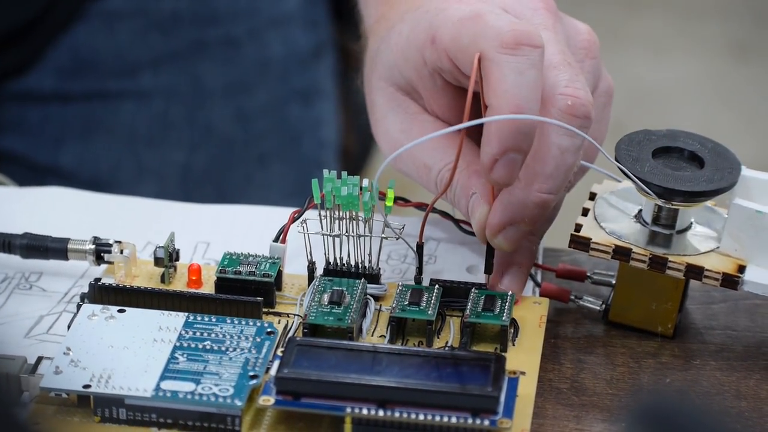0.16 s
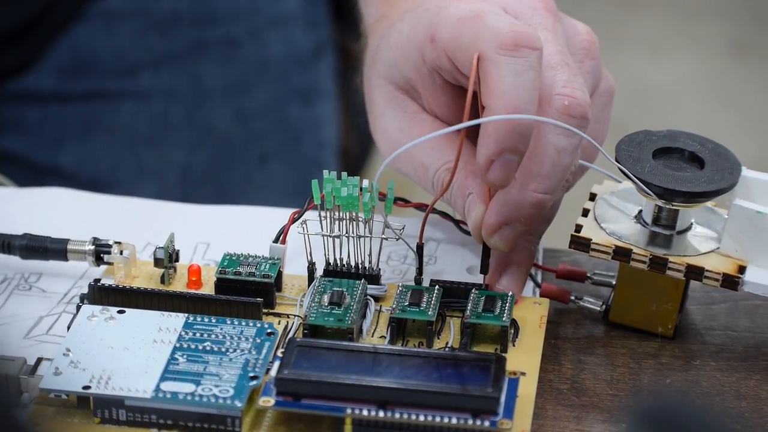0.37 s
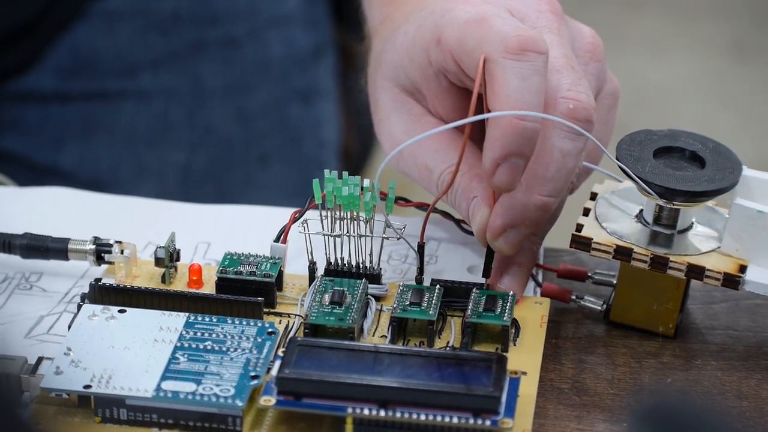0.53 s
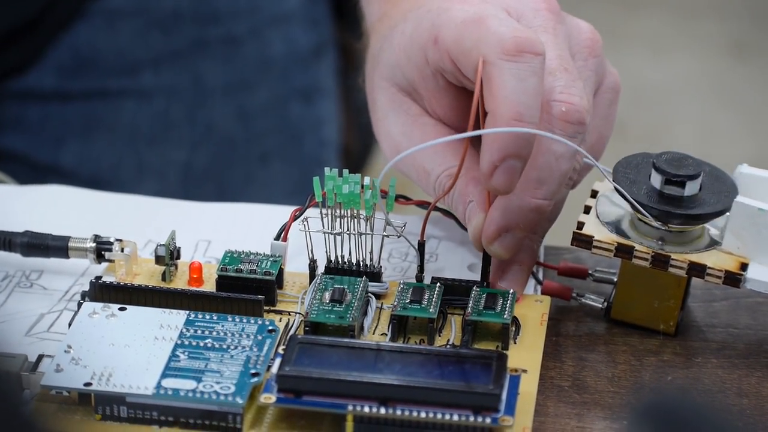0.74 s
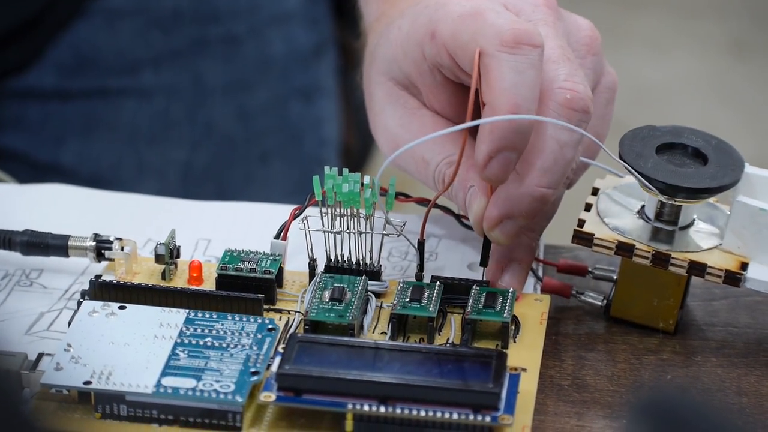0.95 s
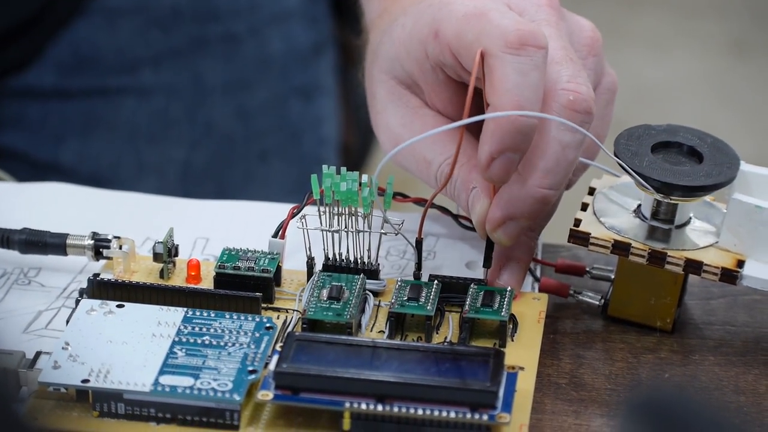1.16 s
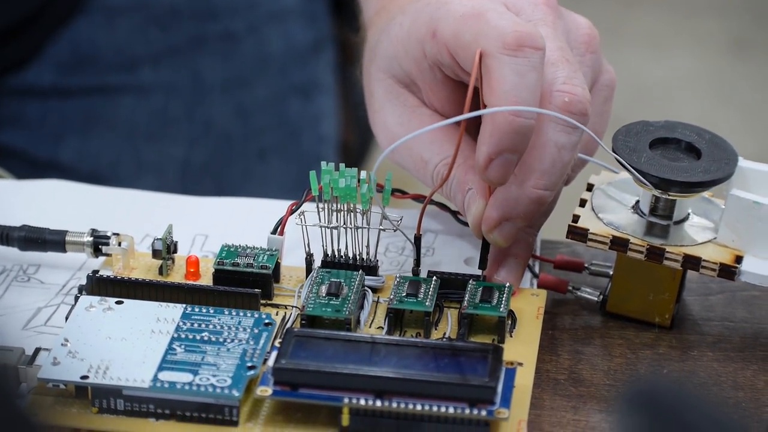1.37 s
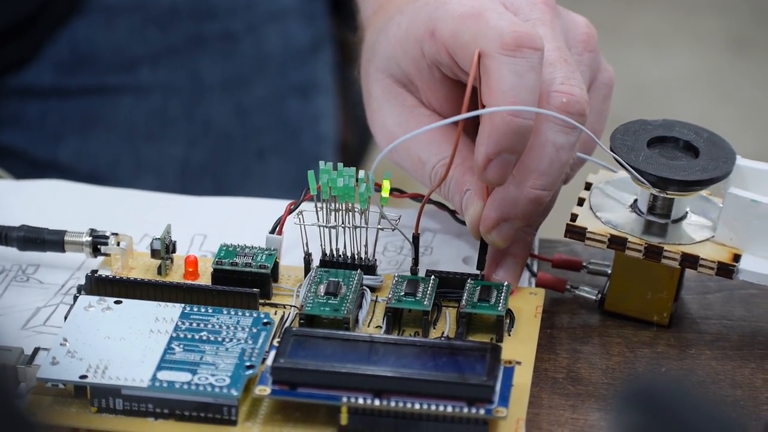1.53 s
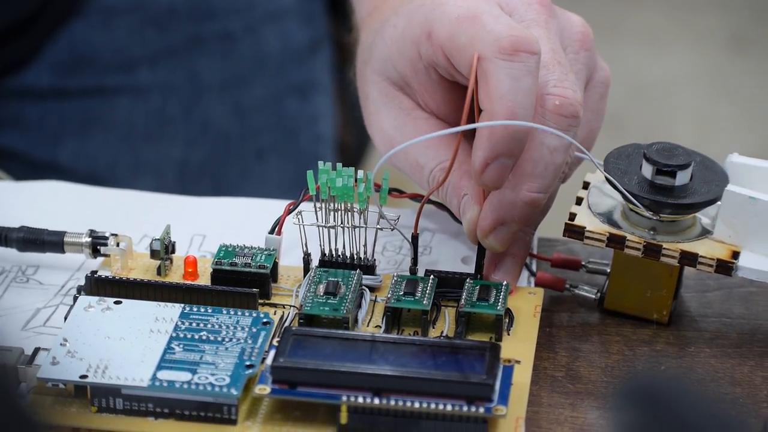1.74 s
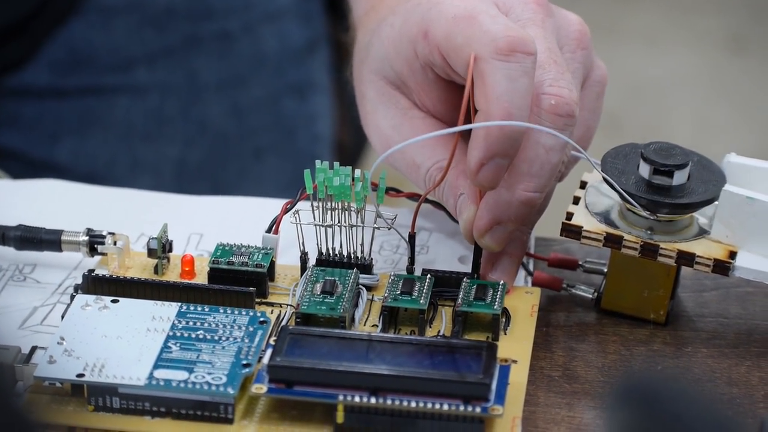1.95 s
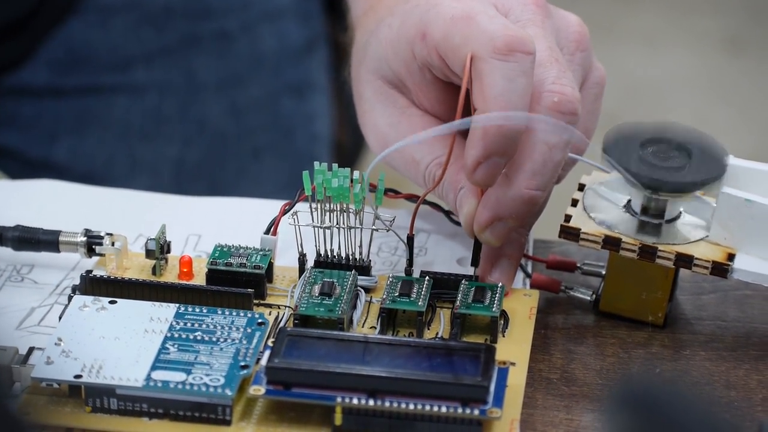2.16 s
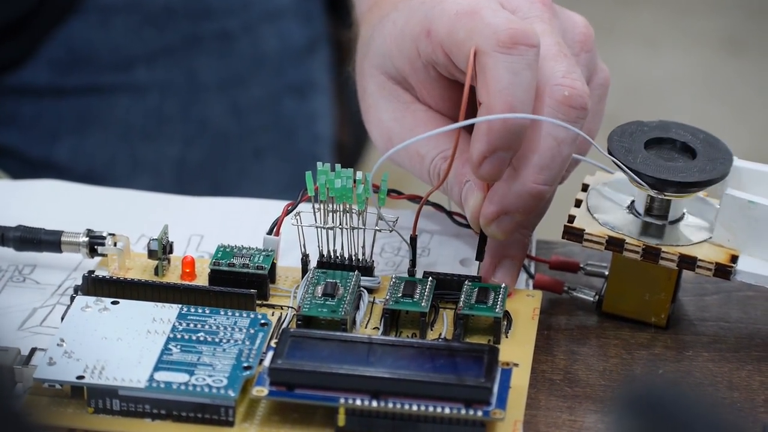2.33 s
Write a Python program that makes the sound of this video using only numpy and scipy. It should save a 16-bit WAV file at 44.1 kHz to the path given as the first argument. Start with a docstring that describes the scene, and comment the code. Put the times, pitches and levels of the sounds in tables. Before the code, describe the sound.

A solenoid clacks on and off twice over faint, steady room air. At about 0.8 seconds a wire ticks lightly and the steel plunger slams in, thumping its wooden stand with a short, low room boom. At 1.0 it springs back with a quick metallic rattle. Another tick and slam come at 1.8 seconds, and the plunger rattles back again at about 2.3.

```python
"""Over the steady air of a small room, a bare wire ticks as it switches on a solenoid on a plywood stand.
The plunger scrapes down its bore and slams home: the steel rings, the stand thumps, the workbench
reflects the blow and the room answers with a low boom. When the current stops, a spring throws the
plunger back and it rattles against its stop. The wire rubs faintly, and the solenoid is switched
on and off once more, this time held a little longer."""
import sys
import numpy as np
from scipy import signal
from scipy.fft import rfft, irfft
from scipy.io import wavfile

SR = 44100
rng = np.random.default_rng(int(sys.argv[2]) if len(sys.argv) > 2 else 0)


def transcribe(signal):
    """Save signal, clipped to [-1, 1], as a 16-bit WAV file at the path in sys.argv[1]."""
    frames = np.atleast_2d(signal).T
    limited = np.clip(frames, -1, 1)
    pcm = np.round(limited * 32767).astype(np.int16)
    wavfile.write(sys.argv[1], SR, pcm)


N = 105663
T = np.arange(SR) / SR  # one second, the time axis of a single event

# The plunger is pulled in. Each row: time of the slam in seconds, its gain in dB,
# length of the slide before it in seconds, gain of the slide in dB.
PULL_EVENTS = [(0.8272, -1, .018, -0.5), (1.7808, 0, 0.022, -2.5)]
# The plunger is let go. Each row: time of the knock in seconds, its gain in dB, gain of the boom in dB.
RELEASE_EVENTS = [(1.0191, 1.5, 1.5), (2.2876, 0.5, -3)]
# Spectrum of steel sliding on steel. Each row: frequency in Hz, relative level in dB.
SCRAPE_SPECTRUM = [(200, 0.5), (1200, -21), (1800, 2), (2800, -14), (4800, -5), (5600, -5), (6200, -1),
                   (7000, -11), (11000, -10), (15000, -11.5)]
# Two close tones of the bore. Each row: frequency in Hz, relative level in dB.
BORE_TONES = [(5830, -5), (5940, -4)]


def amp(db):
    """Amplitude ratio: a factor of ten for every 20 dB."""
    return 10 ** (np.asarray(db) / 20)


def unit(x):
    """Normalisation to a root-mean-square value of 1."""
    return x / np.sqrt(np.mean(x ** 2) + 1e-20)


def read(points, hz):
    """Interpolation of a table along a logarithmic frequency axis."""
    table_hz, values = np.transpose(points)
    return np.interp(np.log(hz + 1), np.log(table_hz), values)


def add(mix, start_s, sound):
    """Superposition: a sound adds to the mix from its start time on."""
    part = mix[round(start_s * SR):][:len(sound)]
    part += sound[:len(part)]


def fade(t60, t=T):
    """Exponential damping: a fall of 60 dB in t60 seconds."""
    return np.exp(-np.log(1000) * t / np.maximum(t60, 1e-3))


def colour(x, spectrum):
    """Minimum-phase filtering: the spectrum is shaped and no sound precedes its cause."""
    hz = abs(np.fft.fftfreq(4096, 1 / SR))
    log_gain = np.log(amp(read(spectrum, hz)))
    response = np.exp(np.conj(signal.hilbert(log_gain)))
    taps = np.fft.ifft(response).real
    return signal.fftconvolve(x, taps[:len(taps) // 2])[:len(x)]


def band(size, hz, width_hz):
    """Resonance: one peak selects a band from white noise, scaled to rms 1."""
    detuning_hz = np.fft.rfftfreq(N, 1 / SR) - hz
    spectrum = rfft(rng.standard_normal(N)) / (1 + (2 * detuning_hz / width_hz) ** 2)
    return unit(irfft(spectrum, N)[:size])


def burst(t60):
    """Broadband transient: decaying noise, whitened to an even spectrum, with energy 1."""
    noise = rng.standard_normal(SR) * fade(t60)
    window = np.minimum(1, fade(t60) * 10)
    for _ in range(5):
        spectrum = rfft(noise)
        noise = irfft(spectrum / (abs(spectrum) + 1e-12), SR) * window
    return noise / np.linalg.norm(noise)


def contact(spectrum, t60):
    """Impact excitation: a brief force gives a broad, coloured burst that starts near rms 1."""
    impact = colour(burst(t60), spectrum)
    return impact * np.linalg.norm(fade(t60)) / np.linalg.norm(impact)


def ring(modes):
    """Modal vibration: a struck body sounds as damped sines, neighbours in opposite phase."""
    return sum((-1) ** k * amp(db) * fade(t60) * np.sin(2 * np.pi * hz * T)
               for k, (hz, db, t60) in enumerate(modes))


def room_air():
    """Stationary noise: a broad floor, with narrow bands that waver as a ventilation hum."""
    # Spectrum of the background. Each row: frequency in Hz, relative level in dB.
    air_spectrum = [(15, -23), (25, -21), (59, -3), (77, -1), (91, -5.5), (126, -1.5), (183, -13),
                    (215, -7), (289, -11), (331, -4.5), (445, -13.5), (600, -11.5), (848, -11.5),
                    (1020, -15), (1400, -20.5), (1900, -23), (2600, -27), (4500, -30.5), (8000, -31.5),
                    (15500, -33.5)]
    # Ventilation hum. Each row: centre frequency in Hz, level in dB.
    hum_bands = [(66, -66), (210, -66)]
    noise = colour(rng.standard_normal(N + SR), air_spectrum)[SR:]
    hum = sum(amp(db) * band(N, hz, width_hz=19.5) for hz, db in hum_bands)
    return amp(-57.5) * unit(noise) + hum


def early_reflections(sound, db, delay_s=0.008):
    """Reflection: the bench and the things on it return a dense cluster of short echoes."""
    response = np.zeros(SR)
    add(response, delay_s, amp(db) * burst(t60=0.045))
    return signal.fftconvolve(sound, response)[:len(sound)]


def reverberation(spectrum, rise_s, delay_s=0.007):
    """Diffuse field: echoes build up and then decay, the treble being absorbed first."""
    # Decay of the room. Each row: frequency in Hz, reverberation time in seconds.
    room_t60 = [(100, 1), (300, 0.77), (800, 0.61), (2000, 0.58), (6000, 0.52), (10000, 0.403),
                (15500, 0.34)]
    hz, t, noise_bands = signal.stft(rng.standard_normal(SR), SR, nperseg=512)
    decay = fade(read(room_t60, hz)[:, None], t)
    band_energy = SR * np.mean(decay ** 2, axis=1, keepdims=True)
    field = signal.istft(noise_bands * decay / np.sqrt(band_energy), SR)[1][:SR]
    build_up = 1 - np.exp(-T / rise_s)
    echo = np.zeros(SR)
    add(echo, delay_s, colour(field * build_up, spectrum))
    return echo


def room_boom():
    """Standing waves: low modes of the room swell and die after each pull and release."""
    # Each row: frequency in Hz, base level after a pull in dB, base level after a release in dB,
    # time to the crest in seconds, sharpness of the swell.
    room_modes = [(120.1, -30.5, -39.5, .045, 1.5), (108.47, -45.5, -48, .24, 8.7),
                  (103, -46, -42, 0.041, 2.5)]
    lag_s = 0.012  # a release stirs the room only once the stand shakes
    out = np.zeros(N)
    for hz, pull_db, release_db, crest_s, sharpness in room_modes:
        swell = (T / crest_s * np.exp(1 - T / crest_s)) ** sharpness
        wave = swell * np.sin(2 * np.pi * hz * T)
        for start_s, db, _, _ in PULL_EVENTS:
            add(out, start_s, amp(pull_db + db) * wave)
        for start_s, _, boom_db in RELEASE_EVENTS:
            add(out, start_s + lag_s, amp(release_db + boom_db) * wave)
    return out


def ticks_and_rubs(tick_t60=0.035):
    """Light impact and friction: wire and loose plunger tick, and the wire rubs on its contact."""
    # Ticks just before each pull. Each row: start in seconds, level in dB.
    ticks = [(0.797, -44), (0.810, -51), (1.7496, -50.5), (1.7655, -38.5)]
    # Faint rubs. Each row: start in seconds, level in dB.
    rubs = [(1.529, -62), (2.15, -63.5)]
    out = np.zeros(N)
    ping = ring([(hz, db, tick_t60) for hz, db in BORE_TONES])
    for start_s, db in ticks:
        scratch = amp(-9) * contact(SCRAPE_SPECTRUM, tick_t60)
        add(out, start_s, amp(db) * (ping + scratch))
    for start_s, db in rubs:
        add(out, start_s, amp(db) * band(SR, hz=1930, width_hz=1400) * fade(t60=0.15))
    return out


def plunger_slide(length_s, scrape_db, ring_db, swell_db):
    """Sliding friction: the plunger scrapes the bore and makes it sing, louder as it gathers speed."""
    size = round(length_s * SR)
    scrape = unit(colour(rng.standard_normal(SR), SCRAPE_SPECTRUM)[:size])
    tones = sum(amp(db) * np.sin(2 * np.pi * (hz * T[:size] + rng.random())) for hz, db in BORE_TONES)
    swell = amp(np.linspace(-swell_db, 0, size))
    return swell * (amp(scrape_db) * scrape + amp(ring_db) * tones)


def plunger_releases(slide_s=0.01, scatter_hz=35):
    """Inelastic collisions: thrown back by the spring, the plunger bounces and shakes the stand."""
    # Each row: start in seconds, then the gains of clack, thump and chime in dB.
    bounces = [(1.0195, -2, -26, -5), (1.0215, -2, -22, -12), (1.027, -4.5, -2, 6), (1.0295, 1.5, -3, 0.5),
               (1.0392, -4.5, 3, 5), (1.0404, -10, -3, -7), (1.0490, -9, 2, -9), (1.0560, -16, -5, -7),
               (2.2869, -1.5, -16, -14), (2.2893, 0.5, -33, -3), (2.2960, 2, -21, -3),
               (2.3006, -3.5, -12.5, 1), (2.3080, -1.5, -3, -6), (2.3174, -8, -5, 0),
               (2.326, -11.5, -8.5, -2), (2.3340, -25, -22, -18)]
    # Modes. Each row: frequency in Hz, level in dB, time to fall 60 dB in seconds.
    knock_modes = [(1230, -28, 0.0055), (1800, -26, 0.013)]  # first blow on the stop
    plunger_modes = [(802, -38.5, 0.057), (973, -35.5, 0.047), (1677, -46.5, 0.15), (1994, -36.5, 0.056),
                     (2550, -39.5, 0.075), (2665, -42, .05), (3630, -45, 0.063), (5885, -38, 0.033)]  # free plunger and its cap
    spring_modes = [(294, -35, 0.42), (405, -38, 0.11), (527.3, -39, 0.17)]  # wire and spring
    # Spectra. Each row: frequency in Hz, relative level in dB.
    clack_spectrum = [(100, -11), (600, -7), (1000, -3), (1400, -1.5), (1900, 3.5), (2650, -4.5),
                      (3000, -10.5), (3700, -6.5), (4700, -11), (5600, -6), (5880, 2.5), (6300, -18),
                      (7000, -16.5), (11500, -21), (13800, -13), (15500, -14)]  # plunger on its stop
    thump_spectrum = [(40, -47.5), (100, 5), (250, -1.5), (600, -2), (1000, -4), (2000, -14.5), (8000, -53)]  # shaken stand
    radiated_spectrum = [(50, -15), (110, 10.5), (200, 7), (300, 14.5), (400, 14.5), (550, 11.5),
                         (700, 2.5), (900, 7), (1300, -3.5), (1900, 4.5), (2600, -0.5), (3000, -4.5),
                         (3600, -5), (5200, -15.5), (6200, -4), (6800, -16.5), (10000, -17.5), (14000, -19),
                         (15500, -19)]  # the rattle as it spreads into the room
    direct, echo = np.zeros(N), np.zeros(N)
    for start_s, db, _ in RELEASE_EVENTS:
        slide = plunger_slide(slide_s, scrape_db=-32.5, ring_db=-35, swell_db=23.5)
        add(direct, start_s - slide_s, amp(db) * slide)
        add(direct, start_s, amp(db) * ring(knock_modes))
        add(echo, start_s, amp(db) * reverberation(radiated_spectrum, rise_s=0.016))
    spring_hum = ring(spring_modes)
    for start_s, clack_db, thump_db, chime_db in bounces:
        # The plunger lands a little differently at every bounce.
        chime = ring([(hz + scatter_hz * rng.standard_normal(), db, t60)
                      for hz, db, t60 in plunger_modes])
        clack = amp(-25.5) * contact(clack_spectrum, t60=0.036)
        thump = amp(-33.5) * contact(thump_spectrum, t60=0.069)
        add(direct, start_s, amp(clack_db) * clack + amp(chime_db) * chime)
        add(direct, start_s, amp(thump_db) * (thump + spring_hum))
    return direct + early_reflections(direct, db=-12.5) + echo


def plunger_pulls(bench_delay_s=0.012, bench_db=-9.5):
    """Impulse response: each slide ends in the same hard slam, which sets steel and stand ringing."""
    # The plunger seats in quick contacts. Each row: delay in seconds, gain in dB.
    seating = [(.001, 0), (.0023, 0.5), (.0042, 4.5)]
    # Modes. Each row: frequency in Hz, level in dB, time to fall 60 dB in seconds.
    stand_modes = [(98.5, -32.5, 0.2), (193.6, -21, 0.051), (284.2, -21, 0.22), (381.2, -27.5, 0.27),
                   (479, -26.5, 0.081), (531, -20.5, 0.11), (607, -20.5, 0.064), (733, -25, 0.089),
                   (788, -20, 0.092), (842, -20, 0.046), (938, -25, 0.08), (1170, -23.5, 0.052),
                   (1405, -38.5, 0.059)]  # plywood stand with the plunger seated
    steel_modes = [(2150, -21, 0.026), (2617, -27, 0.032), (3342, -26, .03), (3570, -26.5, 0.031),
                   (3894, -28, 0.023), (4480, -39, 0.011), (5860, -23.5, 0.026)]  # frame and core
    # Spectra. Each row: frequency in Hz, relative level in dB.
    crack_spectrum = [(100, -3), (600, 3), (1400, 5), (1800, 0), (2500, 3), (3050, -8), (3500, -8),
                      (4200, 0.5), (5000, -9), (5800, -8), (6500, -8.5), (7500, -11), (9300, -7),
                      (12000, -10.5), (15500, -6.5)]  # steel striking steel
    radiated_spectrum = [(50, 2.5), (110, 18.5), (170, 15.5), (240, 15), (330, 24.5), (450, 19.5),
                         (600, 14.5), (850, 15.5), (1100, 5), (1700, 2.5), (2900, -3), (3600, -1.5),
                         (5000, -9.5), (5650, -13), (5950, -0.5), (6300, -14), (6700, -15), (9500, -9),
                         (15500, -17)]  # the slam as it spreads into the room
    stand = ring(stand_modes)
    direct = stand.copy()
    first_contact_s = seating[0][0]
    add(direct, first_contact_s, ring(steel_modes))
    add(direct, bench_delay_s, amp(bench_db) * stand)  # one strong echo off the bench
    for delay_s, db in seating:
        crack = amp(-22) * contact(crack_spectrum, t60=0.01518)
        add(direct, delay_s, amp(db) * crack)
    slam = direct + early_reflections(direct, db=-16) + reverberation(radiated_spectrum, rise_s=0.0027)
    out = np.zeros(N)
    for slam_s, db, slide_s, slide_db in PULL_EVENTS:
        slide = plunger_slide(slide_s, scrape_db=-35.5, ring_db=-33.5, swell_db=15.5)
        add(out, slam_s - slide_s, amp(slide_db) * slide)
        add(out, slam_s, amp(db) * slam)
    return out


def scene():
    """Superposition: the pressures of the solenoid and its room add in one channel."""
    return (plunger_pulls() + plunger_releases() + ticks_and_rubs() + room_boom() + room_air())[None]


def record(dry, low_cut_hz=40, high_cut_hz=15800):
    """Band limiting: two filters remove the deepest rumble and the highest treble."""
    high_pass = signal.butter(2, low_cut_hz, "high", fs=SR, output="sos")
    low_pass = signal.firwin(801, high_cut_hz, window=("kaiser", 9), fs=SR)
    return signal.oaconvolve(signal.sosfilt(high_pass, dry), low_pass[None], "same")


dry = scene()
out = record(dry)
transcribe(out)
```